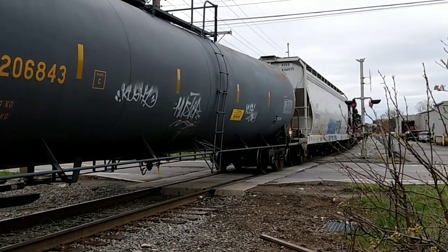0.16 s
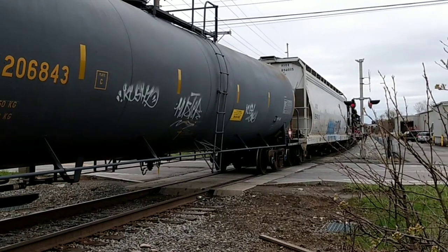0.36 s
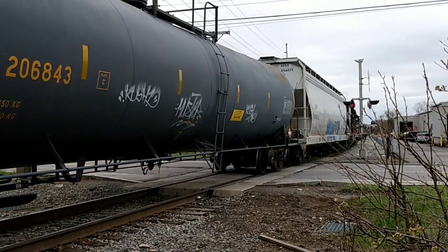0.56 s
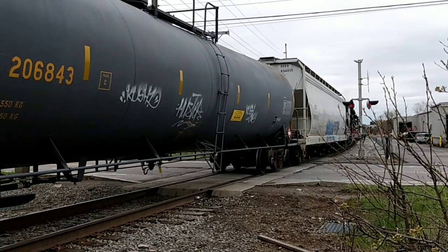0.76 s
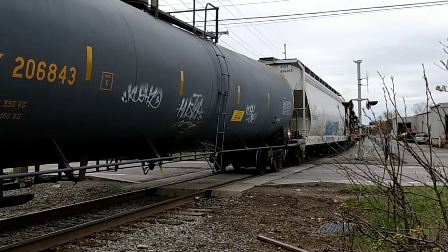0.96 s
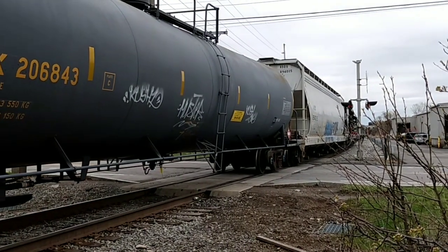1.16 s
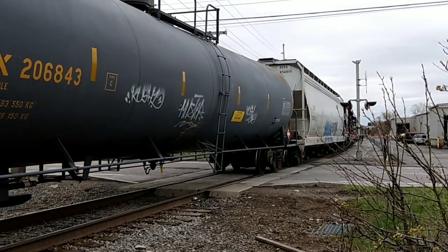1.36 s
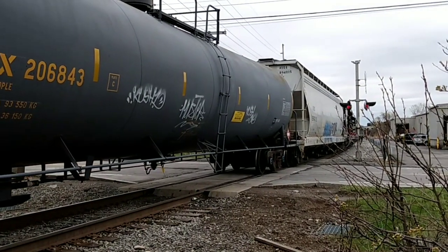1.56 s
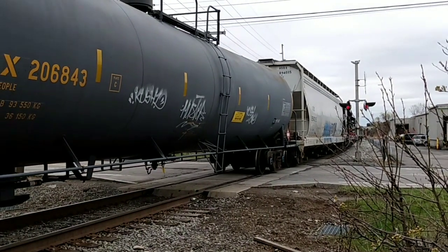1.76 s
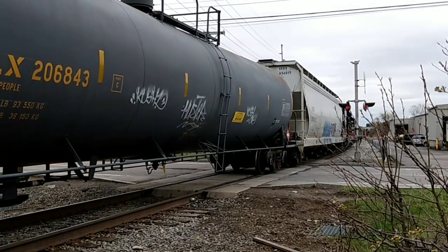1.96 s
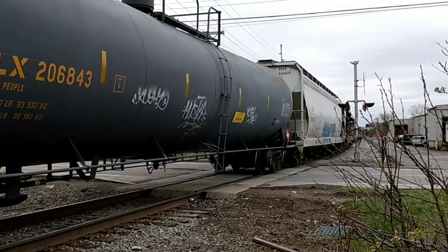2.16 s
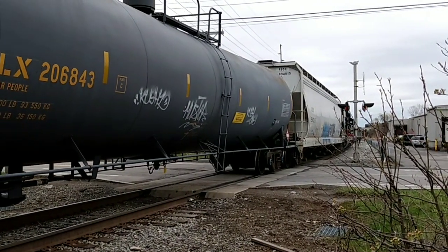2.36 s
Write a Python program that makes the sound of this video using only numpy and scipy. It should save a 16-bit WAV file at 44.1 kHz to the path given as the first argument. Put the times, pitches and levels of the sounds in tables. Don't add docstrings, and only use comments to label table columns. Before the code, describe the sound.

Freight train slack runs out in clanking coupler jolts, sharp brake-air hisses and deep tank thuds

```python
import sys
import numpy as np
from scipy import signal
from scipy.fft import rfft, irfft, next_fast_len
from scipy.io import wavfile
from scipy.ndimage import uniform_filter1d, map_coordinates

SR = 44100
rng = np.random.default_rng(int(sys.argv[2]) if len(sys.argv) > 2 else 0)


def put_to_file(sound):
    columns = np.atleast_2d(sound).T
    safe = np.clip(columns, -1, 1)
    whole_steps = np.round(safe * 32767)
    wavfile.write(sys.argv[1], SR, whole_steps.astype(np.int16))


def boost_factor(decibels):
    exponent = np.asarray(decibels, float) / 20
    return 10 ** exponent


N = 105840


def unit(x):
    return x / np.sqrt(np.mean(x ** 2) + 1e-20)


def along(points, hz):
    f, value = np.transpose(points)
    return np.interp(np.log(hz + 1), np.log(f + 1), value)


def curves(rows):
    s, *columns = np.transpose(rows)
    return [np.interp(np.arange(N) / SR, s, column) for column in columns]


def wobble(rate):
    knots = rng.standard_normal(int(N * rate / SR) + 4)
    return map_coordinates(knots, [np.arange(N) * rate / SR])


def filtered(x, response):
    m = next_fast_len(N + 8192)
    return irfft(rfft(x, m) * response(np.fft.rfftfreq(m, 1 / SR)), m)[..., :N]


# (frequency [Hz], likeness [-1 to 1])
PORT_LIKENESS = [(100, 0.97), (300, 1), (700, 0.35), (1400, 0.89), (2500, 0.067), (5000, 0.17),
                 (12000, 0.066)]


def rush(spectrum, modal_db, patchy_db=1.2):
    z = signal.stft(rng.standard_normal((2, N)), nperseg=1024, noverlap=768)[2]

    def blotches(bins, frames):
        grain = rng.standard_normal(z.shape[1:])
        return unit(uniform_filter1d(uniform_filter1d(grain, size=bins, axis=0), size=frames, axis=1))

    gain = boost_factor(patchy_db * blotches(10, 6) + modal_db * blotches(2, 14))
    pair = signal.istft(z * gain, nperseg=1024, noverlap=768)[1][:, :N]
    closed = [(spectrum[0][0] / 2, -80)] + list(spectrum) + [(spectrum[-1][0] * 2, -80)]

    def mid_and_side(hz):
        angle = np.arccos(np.clip(along(PORT_LIKENESS, hz), -1, 1)) / 2
        return boost_factor(along(closed, hz)) * [np.cos(angle), np.sin(angle)]

    mid, side = filtered(pair, mid_and_side)
    return unit(np.array([mid + side, mid - side]))


# (time [s], hold [s], air hiss level [dB], coupler clank level [dB])
JOLTS = [(-.04, 0.036, -51, -45), (0.108, 0.01, -37, -48), (0.172, 0.066, -86, -41.5),
         (0.219, 0.027, -73, -39), (0.295, 0.029, -67, -38), (0.326, 0.055, -84, -39.5),
         (0.339, 0.017, -30, -40), (0.356, 0.039, -29.5, -28), (0.396, 0.029, -27, -17),
         (0.434, 0.087, -20.5, -20), (0.498, 0.064, -19.5, -34), (0.655, 0.088, -25.5, -23.5),
         (0.719, 0.061, -27.5, -27.5), (0.756, 0.064, -19, -23), (0.594, .04, -28, -29),
         (0.864, 0.079, -28.5, -31), (0.926, 0.059, -24.5, -23.5), (1.011, 0.047, -20, -21.5),
         (1.053, 0.035, -19.5, -42), (1.173, 0.073, -28, -26), (1.302, 0.047, -22, -22.5),
         (1.338, 0.063, -19.5, -50), (1.437, 0.015, -57, -53), (1.535, 0.095, -71, -38),
         (1.7, 0.085, -42.5, -40.5), (1.788, 0.013, -75, -28.5), (1.815, 0.038, -33.5, -36.5),
         (1.914, 0.021, -40, -62), (1.993, .05, -48.5, -47), (2.08, 0.057, -53, -45.5),
         (2.2, 0.1, -65, -53.5)]


def bursts(column, attack_s, t60, late_db=0, rows=JOLTS):
    s, hold, db = (np.array(rows)[:, [k]] for k in (0, 1, column))
    clock = np.arange(0, N + 16, 16)
    t = clock / SR - s
    fall_db = 60 * np.maximum(t - hold, 0) / t60
    shape = np.clip(t / attack_s, 0, 1) * boost_factor(db + late_db - fall_db)
    return np.interp(np.arange(N), clock, np.sqrt(np.sum(shape ** 2, axis=0)))


def ring(s, hz, db, t60, rise_s):
    out = np.zeros(N)
    first = int(np.clip(np.ceil(s * SR), 0, N - 1))
    last = min(N, first + int(t60 * SR) + 1)
    t = np.arange(first, last) / SR - s
    out[first:last] = boost_factor(db - 60 * t / t60) * (1 - np.exp(-t / rise_s)) * np.sin(2 * np.pi * hz * t)
    return out


def yard_echo(column, spectrum, colour):
    wash = filtered(rush(spectrum, modal_db=4.0), lambda hz: boost_factor(along(colour, hz)))
    return bursts(column, attack_s=0.029, t60=1.82, late_db=-13) * wash


# (frequency [Hz], level [dB per Hz])
YARD_NOISE = [(40, 7), (80, -21), (200, -22), (350, -20), (520, -52), (700, -10.5), (1200, -18),
              (2600, -32.5)]


def yard_background():
    return boost_factor(-45.5) * rush(YARD_NOISE, modal_db=2.5)


# (frequency [Hz], level [dB per Hz])
AIR = [(3000, -10.5), (4300, -12), (5200, -5), (7000, -2.5), (8700, -4.5), (11400, 1.5), (14000, -3.5),
       (16000, -6.5)]
# (frequency [Hz], level [dB per Hz])
ROAR = [(1800, -27), (2600, 9), (3300, 5), (4200, 5), (5500, -25)]
# (frequency [Hz], level [dB])
AIR_ECHO = [(3500, -0.5), (4400, 0), (5500, -1.5), (6500, 2.5), (7700, -7), (9500, 2), (16000, -9.5)]


def brake_air(shake):
    hiss = shake * boost_factor(0.76 * wobble(58.9)) * rush(AIR, modal_db=4.0)
    roar_level = boost_factor(-8.5) * shake.max() * (shake / shake.max()) ** 1.33
    roar = roar_level * rush(ROAR, modal_db=6)
    return hiss + roar + yard_echo(column=2, spectrum=AIR, colour=AIR_ECHO)


LOOSE_STEEL = [510, 1038, 2069, 2999, 3181, 7074, 7482, 8586, 9169, 9770, 10691, 11645, 12683, 14371]


def loose_steel(shake):
    taps_per_s, spread_db, t60 = 25, 2, 0.12
    rattle = np.zeros((2, N))
    r = boost_factor(-60 / t60 / SR)
    for hz in LOOSE_STEEL:
        strength = boost_factor(spread_db * rng.standard_normal(N))
        taps = (rng.random(N) < taps_per_s / SR) * strength
        turn = 2 * np.pi * hz / SR
        rung = signal.lfilter([np.sin(turn)], [1, -2 * r * np.cos(turn), r * r], taps * shake)
        rattle += boost_factor(2 * rng.standard_normal((2, 1))) * rung
    return boost_factor(-13.5) * rattle


def air_and_rattle():
    shake = bursts(column=2, attack_s=0.0074, t60=0.32)
    return brake_air(shake) + loose_steel(shake)


# (frequency [Hz], level [dB per Hz])
IRON = [(250, -4.5), (420, -3), (700, -4), (1180, -2), (1500, -6.5), (1900, -6), (2450, -8.5), (3500, -13),
        (6000, -24)]
# (frequency [Hz], level [dB])
IRON_ECHO = [(300, -5), (520, -9), (750, -0.5), (1900, -7), (4400, 3)]
# (time [s], level [dB], fall by 60 dB [s])
RINGS = [(0.323, -32, 0.24), (.44, -55, 0.12), (0.573, -19, 0.2), (.79, -21.5, 0.26), (.81, -15.5, 0.059),
         (0.884, -13, 0.24), (0.945, -23, 0.35), (1.03, -17.5, 0.11), (1.04, -15, .12), (1.067, -22, .15),
         (1.069, -10, 0.067), (1.09, -29, 0.41), (1.202, -31.5, 0.97), (1.305, -45, .3), (1.317, -21, 0.27),
         (1.46, -42, 0.72), (.02, -43, 0.35), (0, -50, .2), (0.123, -60, .8), (0.251, -50, .2),
         (0.824, -23, .25), (0.949, -28, .15), (1.026, -29.5, .3), (1.043, -19, .2), (1.2, -23.5, .2),
         (2.09, -38, .3), (2.24, -51, 1.5)]
RING_HZ = [8300, 11640, 14370, 2990, 1750, 300, 3970, 3185, 13000, 2700, 7072, 10690, 11640, 11640, 7480,
           8845, 600, 1800, 1130, 1130, 2700, 1370, 1800, 1368, 465, 965, 690]


def couplers():
    level = bursts(column=3, attack_s=0.017, t60=0.7)
    clank = level * boost_factor(0.55 * wobble(90)) * rush(IRON, modal_db=3)
    rings = sum(ring(s, hz, db, t60, rise_s=0.0019) for hz, (s, db, t60) in zip(RING_HZ, RINGS))
    return clank + yard_echo(column=3, spectrum=IRON, colour=IRON_ECHO) + rings


# (time [s], hold [s], level [dB])
GROANS = [
    (-.03, 0.085, -44),
    (.2, 0.13, -46),
    (.338, 0.076, -25),
    (.99, 0.045, -29),
    (1.55, 0.056, -37.5),
    (1.66, 0.15, -40),
    (1.79, 0.093, -33.5),
]
# (frequency [Hz], level [dB per Hz])
FRAME = [(260, -15), (380, 1.5), (600, -3), (1000, -5), (1300, -15)]


def frame():
    return bursts(column=2, attack_s=0.017, t60=0.53, rows=GROANS) * rush(FRAME, modal_db=3)


# (time [s], level [dB], share of upper drumming [0 to 1])
SHELL = [(0, -43.5, 0.08), (.2, -36, 0.07), (.33, -30, 0.22), (.39, -20.5, 0.84), (.5, -15, 0.29),
         (.65, -21.5, 0.65), (.77, -15.5, 0.45), (.93, -17.5, 0.38), (1.1, -16.5, 0.27), (1.16, -22, 0.83),
         (1.34, -20, 0.63), (1.5, -26, 0.3), (1.62, -30, 0.58), (1.74, -38, 1), (1.78, -31.5, 0.2),
         (1.82, -28, 0.77), (2.22, -33.5, 0.1), (2.4, -32.5, 0.1)]
# (frequency [Hz], level [dB per Hz])
BOOM = [(25, -30), (50, -17), (68, -6), (86, 0), (100, -7), (140, -22)]
# (frequency [Hz], level [dB per Hz])
DRUM = [(70, -65), (120, -1.5), (180, -2), (260, -3), (400, -9.5), (700, -17.5)]
# (time [s], peak level [dB], frequency [Hz], fall by 60 dB [s])
THUDS = [(0.117, -18, 76, 0.28), (0.204, -17.5, 61.5, 0.28), (0.364, -18, 133, 0.26),
         (0.399, -12, 221, 0.11), (0.49, -6, 240, 0.14), (0.548, -11, 80, 0.35), (0.682, -12, 182.3, 0.14),
         (0.744, -8, 160, 0.07), (0.781, -10, 105, 0.13), (0.817, -2, 83.4, 0.071),
         (0.873, -11, 64.6, 0.13), (0.961, -2.5, 191, 0.099), (1.052, -11.5, 180.5, 0.25),
         (1.098, -12, 95.5, 0.27), (1.199, -4.5, 168.5, 0.13), (1.234, -33, 69.4, 0.13),
         (1.307, -15.5, 72, 0.25), (1.429, -15, 75.4, 0.21), (1.583, -21.5, 69.4, 0.19),
         (1.798, -13, 119, 0.11), (1.203, -5, 251, 0.088), (1.243, -16.5, 292, 0.12),
         (1.31, -14.5, 184, .12), (1.36, -15, 170, 0.16), (2.179, -33.5, 330, 0.36), (2.25, -34, 344, 0.3),
         (2.289, -31, 311, 0.13), (2.339, -40, 354, 0.11), (2.374, -34, 330, 0.13), (.2, -30.5, 160, 0.37),
         (2.311, -26.5, 186, 0.41), (.76, -15, 133, .15), (0.842, -15, 148, .15), (0.446, -10.5, 164, 0.14),
         (0.471, -10, 68.5, 0.17), (1.861, -21, 61.4, .2)]


def tank():
    level_db, share = curves(SHELL)
    share = np.clip(share, 0, 1)
    note_hz = 82.5 + 8.85 * wobble(14)
    note = np.sqrt(2) * np.sin(2 * np.pi * np.cumsum(note_hz) / SR)
    boom = boost_factor(-3 + 0.63 * wobble(25)) * note + boost_factor(-5) * rush(BOOM, modal_db=1.2)
    drum = boost_factor(1.5 * wobble(35.18)) * rush(DRUM, patchy_db=-1.0, modal_db=1.5)
    hum = np.sqrt(1 - share) * boom + np.sqrt(share) * drum
    thuds = sum(ring(s, hz, db - 2.5, t60, rise_s=0.0043) for s, db, hz, t60 in THUDS)
    return boost_factor(level_db - 1.5) * hum + thuds


# (time [s], level [dB])
BREEZE = [
    (1.5, -56),
    (1.85, -27.5),
    (2.15, -31),
    (2.23, -42),
    (2.4, -44),
]
# (time [s], peak level [dB], frequency [Hz])
PATS = [
    (1.929, -5.5, 167),
    (1.943, -7, 95),
    (1.993, -13.5, 170),
    (2.032, -13, 84),
    (2.08, -8, 116),
    (2.113, -13, 82),
    (2.13, -11, 91),
    (2.15, -11.5, 164),
    (2.189, -15, 103),
]


def wind():
    level_db, = curves(BREEZE)
    flutter = boost_factor(level_db + 3.6 * wobble(29.87)) * rush(DRUM, patchy_db=0.5, modal_db=-0.6)[0]
    pats = sum(ring(s + 0.00426, hz, db + 6, t60=0.041, rise_s=0.0025) for s, db, hz in PATS)
    right_db = -39
    return (flutter + pats) * boost_factor([[0], [right_db]])


# (frequency [Hz], level [dB])
RIGHT_PORT = [(100, -2), (700, 0), (1500, 5), (2100, 1), (2700, -8.5), (4000, 4.5), (7000, -4), (14000, -6)]
# (frequency [Hz], delay [s])
RIGHT_LAG = [(100, 0.00026), (700, 0.00025), (2000, 0.00056), (5000, 0.000682)]


def scene():
    left, right = yard_background() + air_and_rattle() + couplers() + frame() + tank()

    def right_path(hz):
        return boost_factor(along(RIGHT_PORT, hz)) * np.exp(-2j * np.pi * hz * along(RIGHT_LAG, hz))

    return boost_factor(1) * np.array([left, filtered(right, right_path)]) + wind()


def top_cut(x):
    return signal.sosfilt(signal.butter(12, 17000, fs=SR, output="sos"), x)


# (time [s], level [dB])
GAIN = [
    (0, 3),
    (.105, -3),
    (.112, -1.5),
    (2.25, 0),
    (2.4, -7.5),
]


def record(dry):
    x = dry * boost_factor(curves(GAIN)[0])
    x = x / (1 + abs(x) ** 4) ** (1 / 4)
    mix = filtered(x, lambda hz: hz < 15780)
    return top_cut(mix)


dry = scene()
out = record(dry)
put_to_file(out)
```